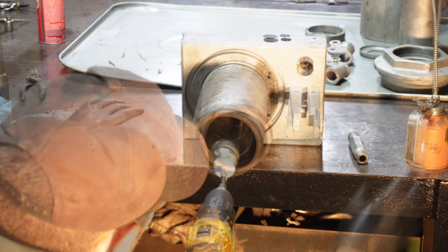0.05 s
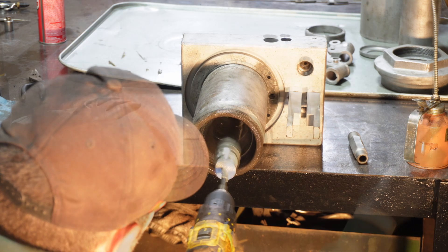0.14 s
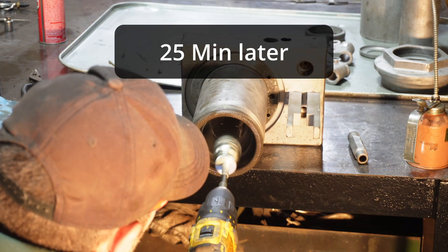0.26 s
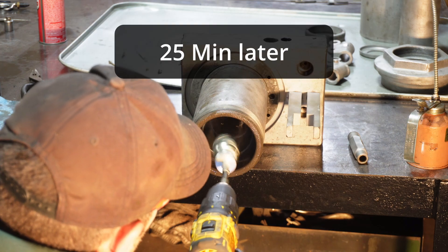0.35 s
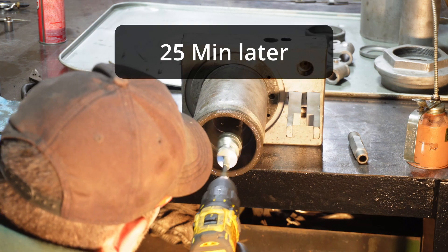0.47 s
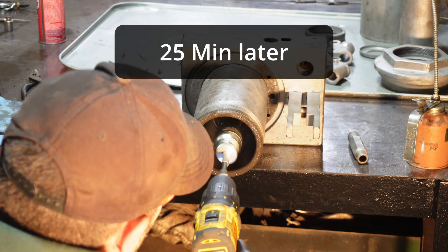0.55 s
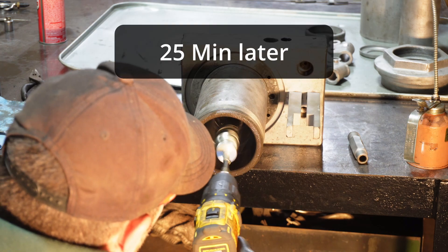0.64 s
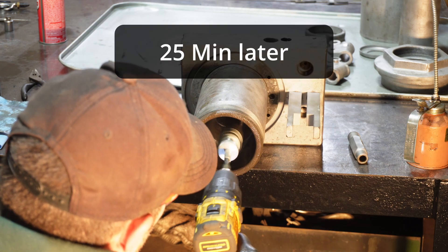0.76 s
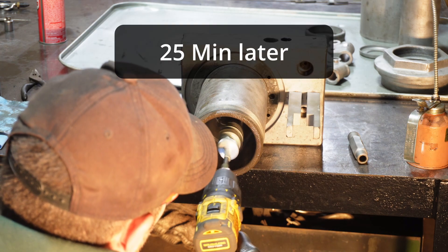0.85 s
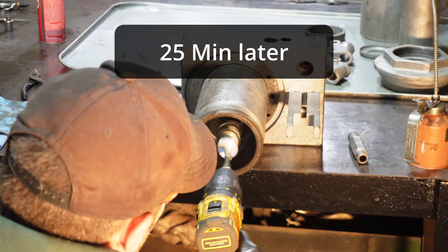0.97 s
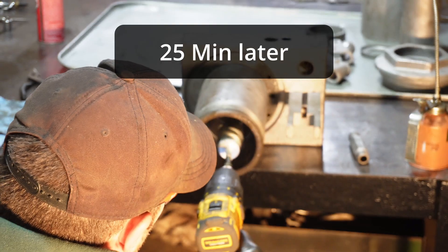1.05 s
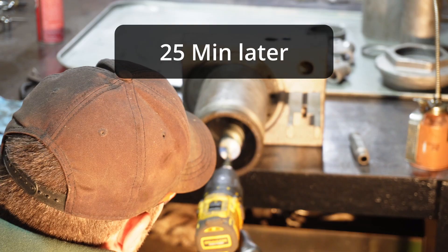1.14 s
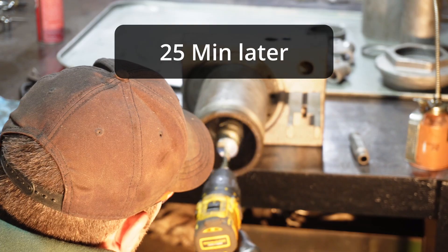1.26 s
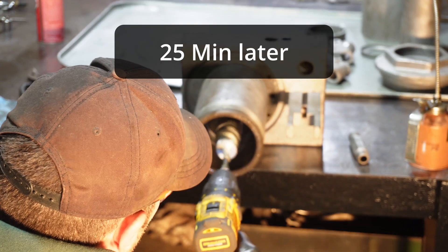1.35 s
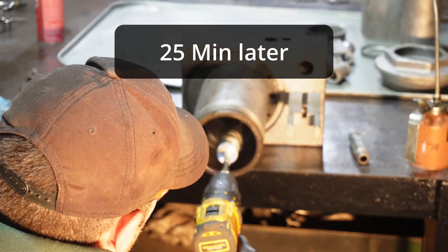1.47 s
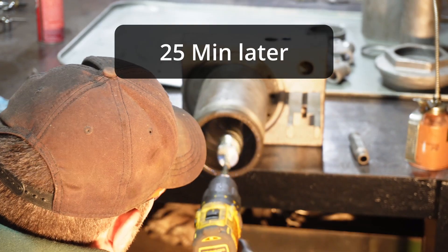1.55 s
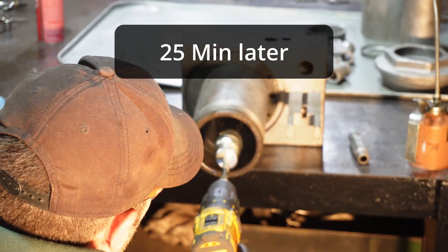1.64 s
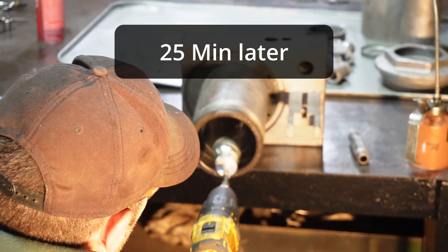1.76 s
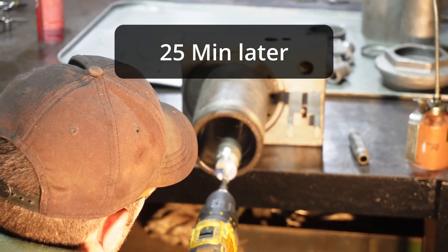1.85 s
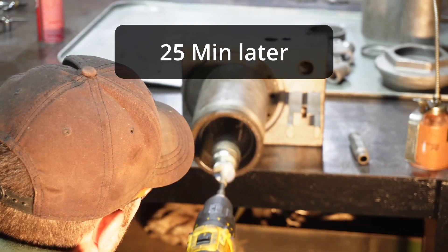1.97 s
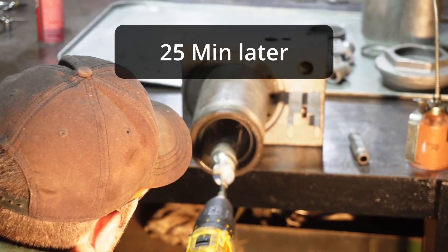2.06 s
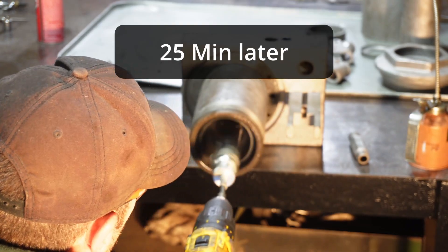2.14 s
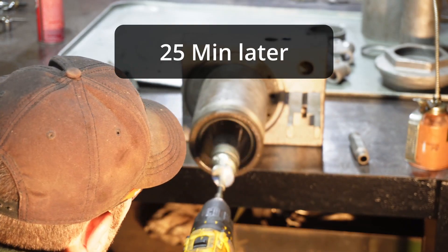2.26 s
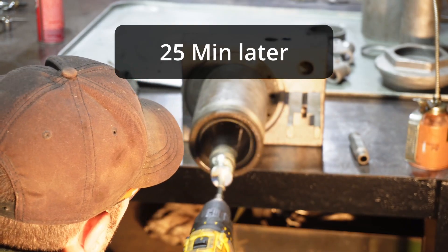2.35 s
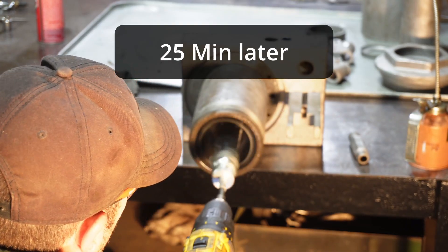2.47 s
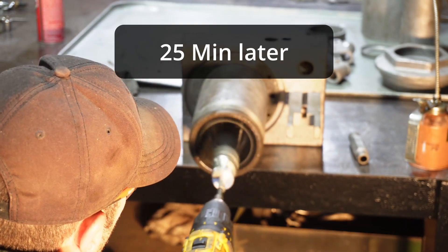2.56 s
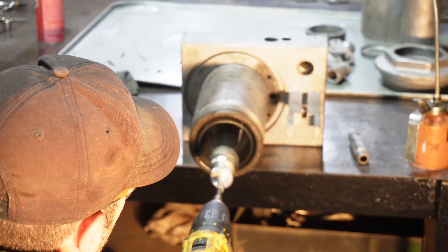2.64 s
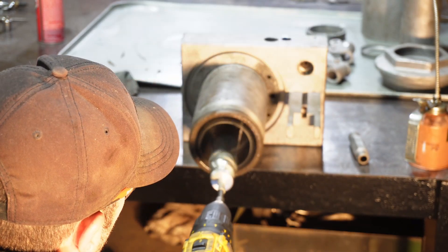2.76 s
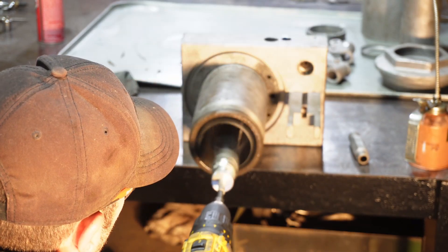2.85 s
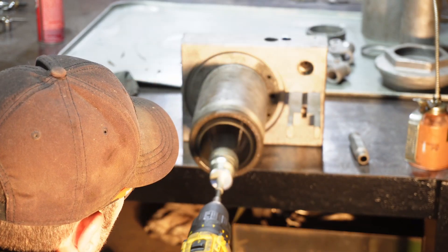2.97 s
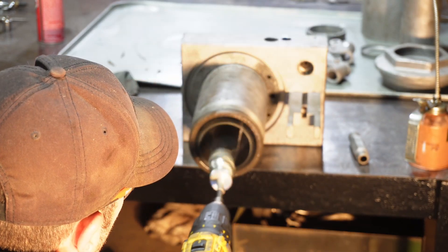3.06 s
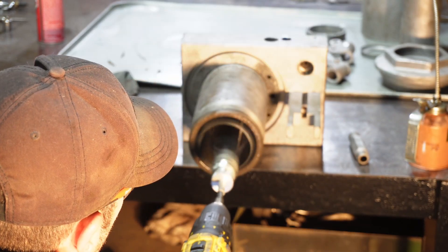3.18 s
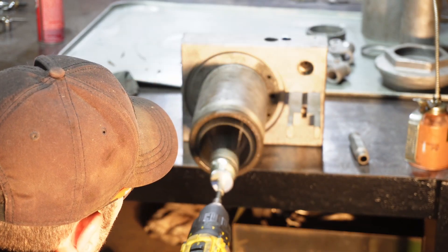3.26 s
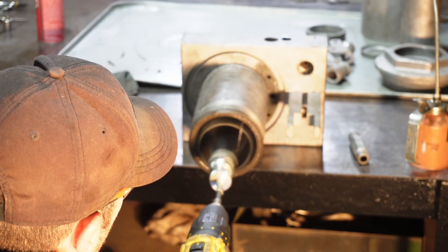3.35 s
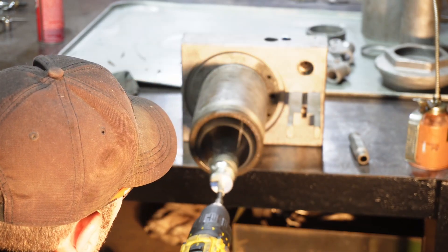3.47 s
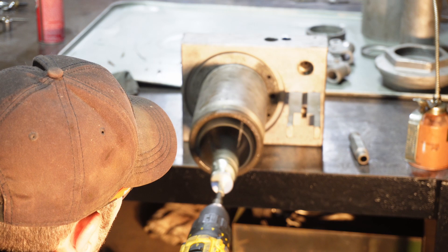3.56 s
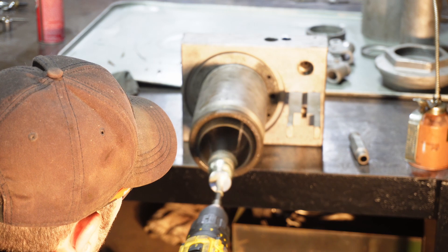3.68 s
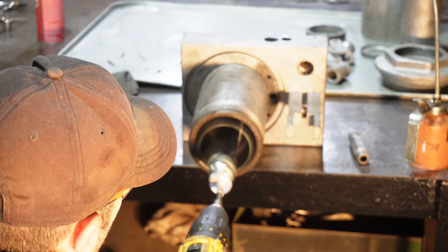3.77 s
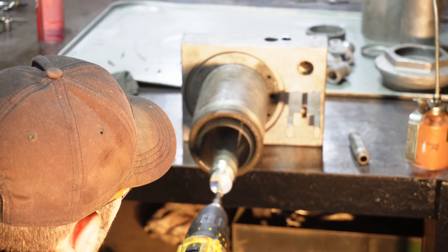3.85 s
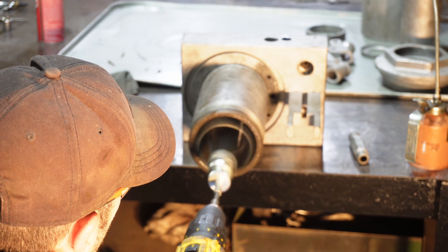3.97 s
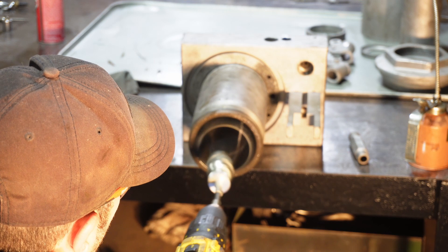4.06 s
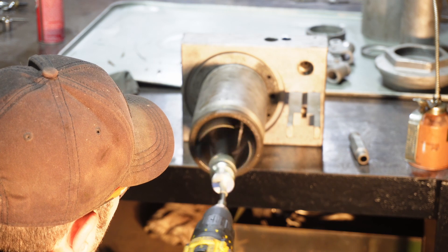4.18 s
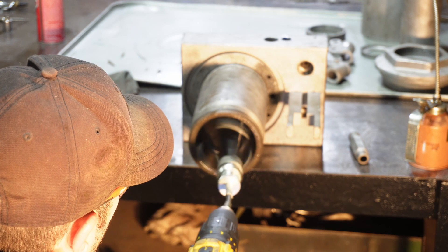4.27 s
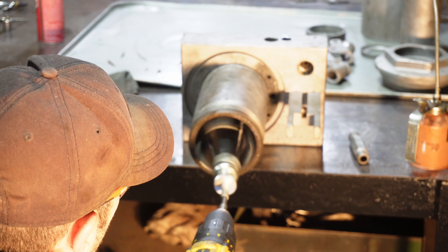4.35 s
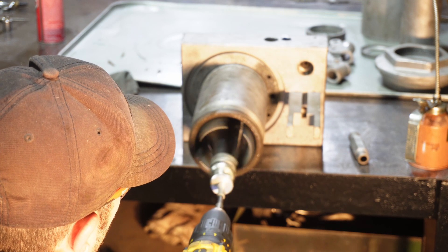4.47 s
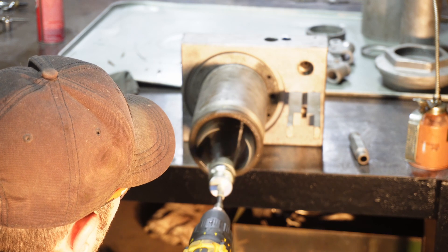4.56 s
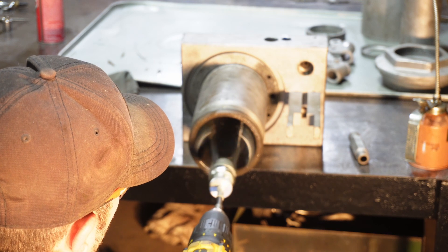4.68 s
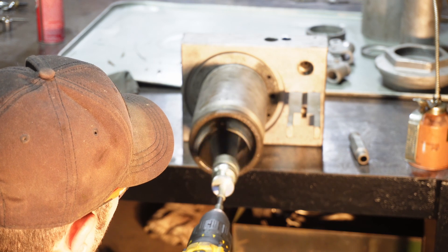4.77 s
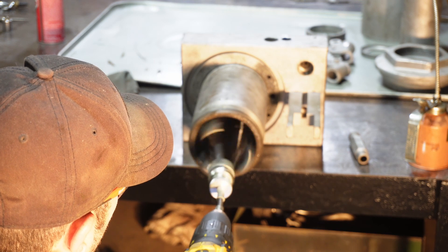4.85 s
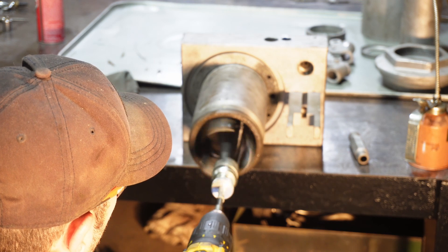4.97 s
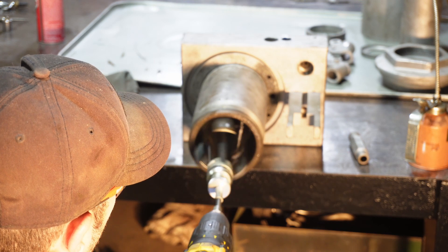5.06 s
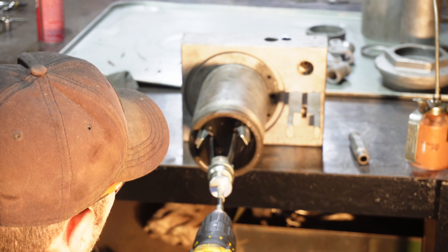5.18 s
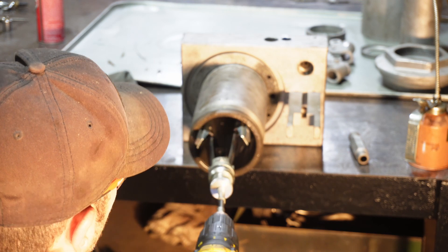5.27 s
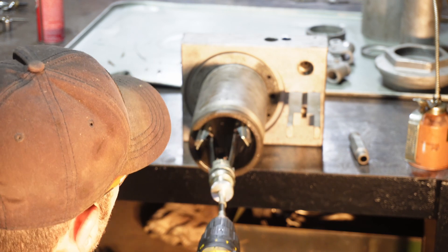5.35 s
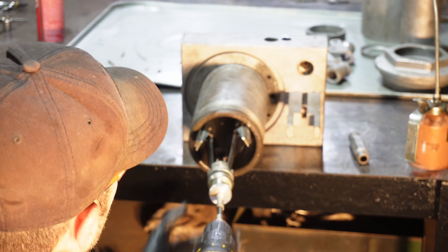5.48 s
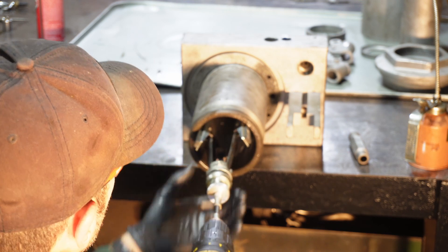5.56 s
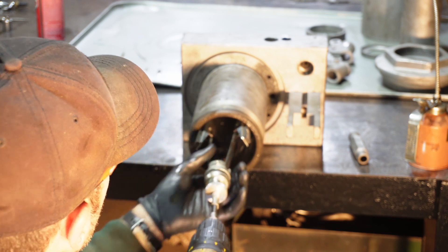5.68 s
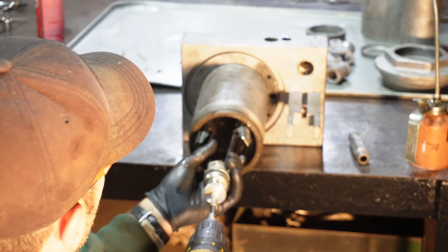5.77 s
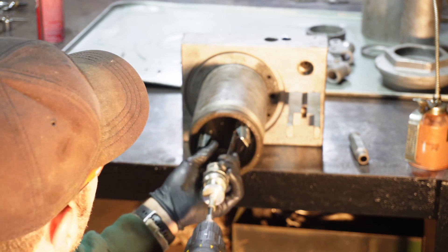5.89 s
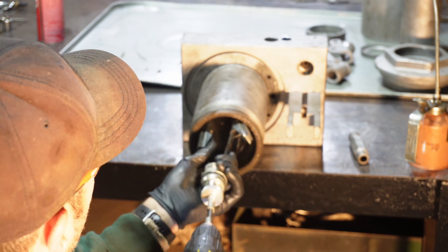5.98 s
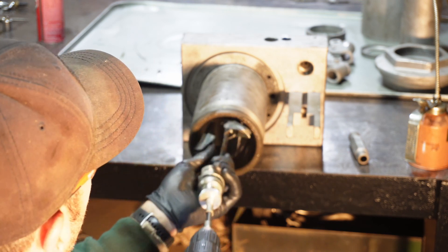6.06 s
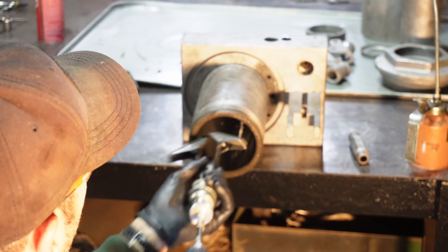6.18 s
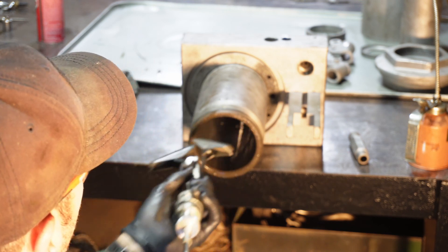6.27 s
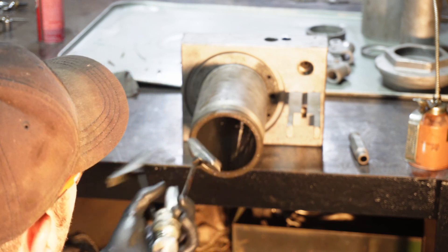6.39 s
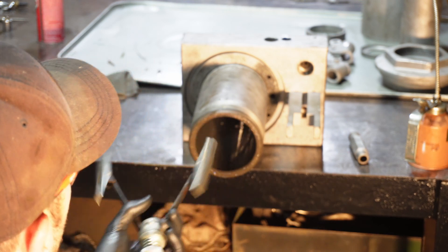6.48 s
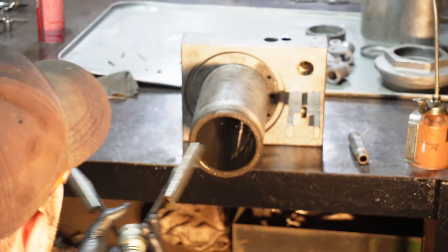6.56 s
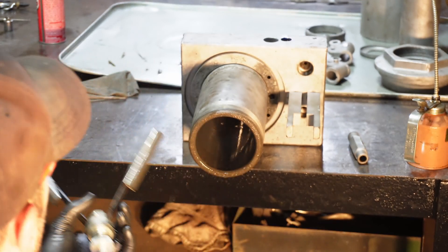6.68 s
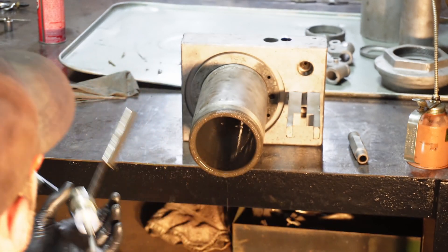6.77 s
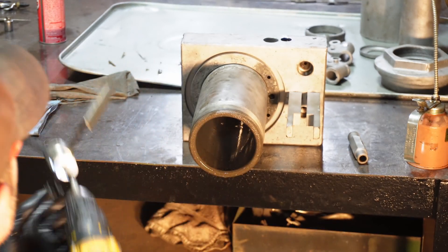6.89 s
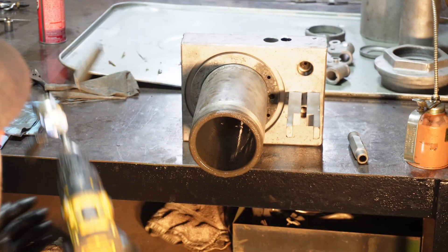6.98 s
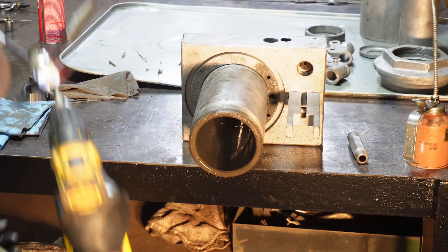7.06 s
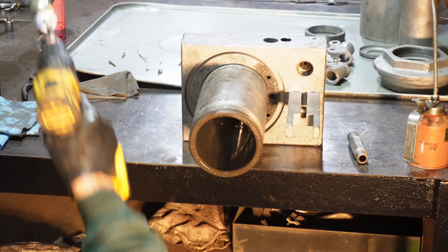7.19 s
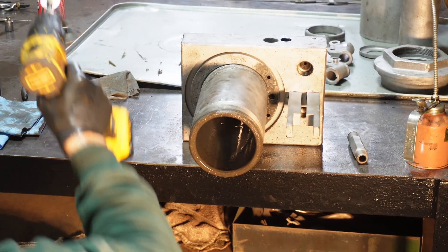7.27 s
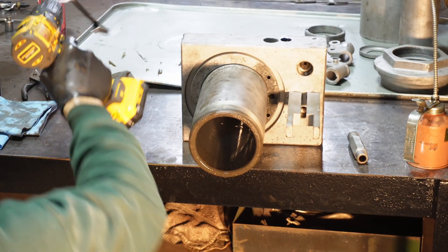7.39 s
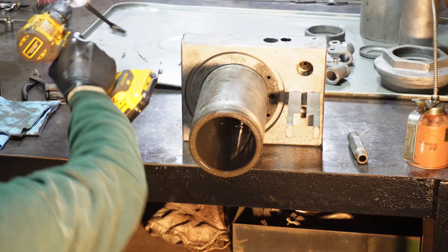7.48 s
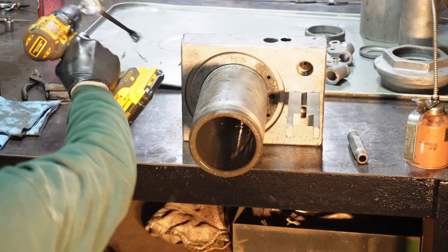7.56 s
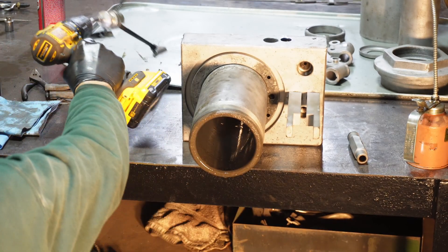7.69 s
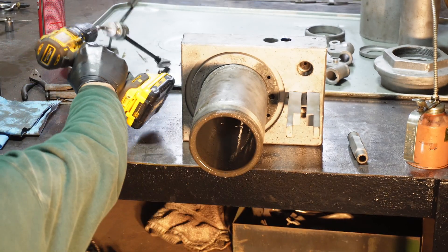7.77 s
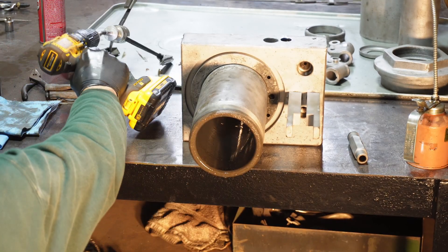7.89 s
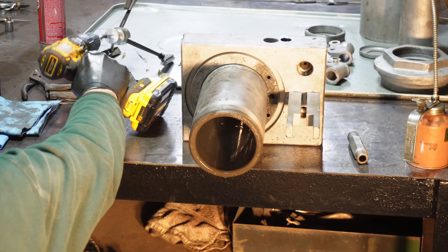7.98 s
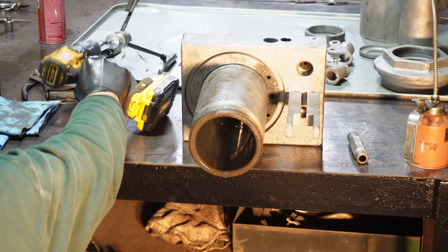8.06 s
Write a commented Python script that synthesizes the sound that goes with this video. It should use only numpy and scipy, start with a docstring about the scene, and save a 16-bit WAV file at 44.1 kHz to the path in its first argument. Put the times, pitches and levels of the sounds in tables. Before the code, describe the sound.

Close to a workshop bench, a cordless drill turns a stone hone inside an oiled steel cylinder, whining high and steady over gritty hiss. The motor eases down, crawls and halts with a dry snap. The hone's arms scrape and clink out of the bore, cloth rustles, and the drill slides and lands with a double thud.

```python
"""A cordless drill spins a spring-armed stone hone in an oiled steel cylinder: motor and gears sing as
tones locked to the shaft, and the stones hiss as gritty noise. The trigger is eased, the drill crawls and stops
with a snap. The hone is drawn out with scraping noise and ringing clinks, a sleeve rustles in noise swells,
and the drill slides over the workbench and is set down as noise thuds with a modal knock."""
import sys
import numpy as np
from scipy import signal
from scipy.fft import rfft, irfft, next_fast_len
from scipy.io import wavfile
from scipy.ndimage import map_coordinates

SR = 44100
rng = np.random.default_rng(int(sys.argv[2]) if len(sys.argv) > 2 else 0)


def store_wav(level_fs):
    """Save 16-bit WAV to argv[1]."""
    pcm = np.round(np.clip(np.atleast_2d(level_fs), -1, 1) * 32767)
    wavfile.write(sys.argv[1], SR, pcm.T.astype(np.int16))


N = 358533  # samples

# Motor whine ride, before trim and line levels: t/s, level/dB
WHINE_RIDE = [(0.0, -35), (0.18, -29.5), (0.4, -31.5), (0.46, -29), (0.91, -30), (1.54, -27.5), (1.61, -29),
              (2.04, -30.5), (2.5, -27), (4.06, -27.5), (4.1, -27)]
# Motor whine pitch under full trigger, before the waver: t/s, f/Hz
WHINE_PITCH = [(0.03, 2596), (0.12, 2601), (0.36, 2521), (0.48, 2555), (0.88, 2558), (1.45, 2601),
               (1.59, 2599), (1.65, 2563), (2.02, 2526), (2.64, 2571), (3.0, 2553), (3.02, 2567),
               (3.8, 2543), (4.11, 2558)]
WHINE_ORDER = 8  # whine cycles per motor turn
# Trigger let out in steps: t/s, glide/s, new motor speed/(turns/s)
TRIGGER_EASES = [(4.13, .2, 116.5), (4.79, .14, 80), (5.1, .05, 56)]
# Motor tones: multiple of motor speed, relative level/dB
MOTOR_TONES = [(1, -22), (2.492, -17.5), (2.758, -12), (2.891, -23), (4, -20.5), (5, -23), (5.383, -26),
               (5.453, -23), (8, 2), (10.57, -21), (10.703, -16)]
# Gear tones: multiple of planet-wheel speed, relative level/dB
GEAR_TONES = [(2, -14), (23, 1.5), (24, -6.5), (25, -3), (48, -1)]
# Shaking of the hone's arms: multiple of spindle speed, relative level/dB
SHAKE_TONES = [(k, 0) for k in range(3, 7)]
PLANET, SPINDLE = 6 / 11, .0656  # turns per motor turn
# How well the drill body radiates gear tones: f/Hz, gain/dB
HOUSING = [(130, -37), (350, -9), (700, -23), (1000, -9), (1200, -13.5), (1470, -5.5), (1900, -18.5),
           (2400, -10.5), (3000, -8), (3300, -7), (4100, 0.5), (4400, 2), (5500, -4.5), (8350, -6.5)]
# Gearbox shell resonances: f/Hz, width/Hz, relative level/dB
GEARBOX_SHELL = [(3390, 120, 0), (4040, 310, -5.5), (5170, 220, -3.5), (8270, 180, -4.5)]
MESH_DB, RATTLE_DB = -35.5, -34.5  # at full speed
STOP_S, STOP_T60_S = 5.16, .03  # the motor halts

# How hard the stones bear on the wall: t/s, load/dB
STONE_LOAD = [(.3, 0.5), (.8, -0.5), (1.4, -1.5), (2, 1), (3.2, 0.5), (4.1, 1)]
FADE_IN_S, FADE_IN_DB = 0.29, 8  # stone hiss and gear tones fade in at the start
# Stone hiss at speed: f/Hz, relative level/dB
FAST_STONES = [(40, -45), (150, -31.5), (400, -12), (900, -7), (1100, -12.5), (1500, -5), (2200, -9.5),
               (3000, -3.5), (3500, -1), (4700, 4), (6300, -2), (7500, -0.5), (11500, -6.5), (14500, -6)]
# Stone hiss at a crawl: f/Hz, relative level/dB
SLOW_STONES = [(59, -65), (100, -31), (271, -16), (315, -10.5), (524, -14.5), (621, -7), (705, -14.5),
               (930, -10.5), (1150, -16.5), (1450, -6.5), (2000, -10.5), (5300, -5.5), (9820, -15.5),
               (14400, -18), (16000, -19)]
# Air column of the cylinder: f/Hz, width/Hz, relative level/dB
BORE_AIR = [(319, 9.6, 4.5), (615, 24, -9.5), (914, 87, 7.5), (1302, 32, -1), (1587, 110, -1.5)]
HISS_DB, BORE_DB = -26.5, -40  # at full speed
HISS_LAW, BORE_LAW, MESH_LAW = 1.04, 1.32, 0.57  # amplitude grows as this power of the speed

# Spindle lock snapping shut as the drill stops
LOCK_S, LOCK_DB = 5.1628, -20  # peak
# Colour of the snap: f/Hz, relative level/dB
SNAP = [(200, -20), (700, -4), (1500, 5), (2500, -1), (4200, 4), (8000, -1.5), (15000, -13)]

# Short pulls drawing out the stopped hone: t/s, length/s, air column level/dB, scrape level/dB, squeak level/dB
PULLS = [(5.156, 0.059, -60, -60, -62), (5.383, 0.11, -61, -70, -90), (5.595, 0.07, -66.5, -83, -92),
         (5.87, 0.09, -63, -63, -65), (5.961, 0.14, -49, -58, -55), (6.1, 0.038, -67, -52, -62),
         (6.2, .12, -54, -58, -67), (6.416, 0.29, -80, -57.5, -76)]
PULL_RISE_S, PULL_T60_S = 0.042, 0.39
# Rub feeding the boom: f/Hz, relative level/dB
PULL_RUB = [(100, -17), (300, 5.5), (500, -8), (1500, -14.5)]
# Boom of the bore: f/Hz, width/Hz, relative level/dB
PULL_BOOM = [(326.0, 8.4, 4.0), (412, 34, -7.5), (451, 10, 2.5)]
# Squeak of the hone: f/Hz, width/Hz, relative level/dB
PULL_SQUEAK = [(2335, 20, -9.5), (2800, 12, -2), (5140, 110, -4)]

# Hone arm striking steel and rebounding: t/s, level before low cut/dB, contact pitch/Hz,
# time between rebounds/s, loss per rebound/dB
CONTACTS = [(5.3265, -40.5, 3640, 0.073, 6.5), (5.8631, -26, 5430, 0.018, 13),
            (6.002, -34.5, 4600, .004, 3), (6.0153, -25, 4630, .012, 23), (6.108, -27.5, 4660, 0.0085, 3),
            (6.128, -18.5, 6070, .01, 10), (6.1727, -22.5, 4070, .011, 16), (6.26, -26, 5050, 0.015, 8),
            (6.4074, -36, 4060, .009, 8), (6.4343, -24, 4050, 0.018, 2), (6.5522, -26, 4570, .01, 11),
            (6.595, -22, 7510, 0.017, 4), (6.781, -35, 4390, 0.028, 16), (6.8289, -29, 4140, 0.023, 23),
            (6.9056, -23.5, 5030, 0.016, 10), (7.085, -36, 6430, .02, 25), (7.3208, -38, 5900, .015, 17),
            (7.5343, -37, 4800, 0.018, 13), (7.604, -36, 5320, 0.029, 5), (7.7608, -43.5, 4200, .02, 18)]
CONTACT_T60_S, REBOUND_SCATTER = 0.023, 0.063  # scatter as a share of each rebound time
# Scratch of arm on steel: f/Hz, relative level/dB
CLINK = [(290, -46), (500, -9.5), (960, -7), (1050, -10), (1770, -17), (2070, -14), (3390, -11.5),
         (4150, -2), (6060, -9), (6800, -14), (8090, -7), (10100, -22.5), (11300, -16.5), (14000, -22),
         (16000, -33)]
# Steel of hone and cylinder: f/Hz, relative level/dB, t60/s
STEEL = [(2380, -8, .2), (2820, -3, 0.21), (3750, 1, .15), (4170, -10, 0.12), (4400, -2, .3),
         (4600, -4, 0.23), (5220, -4, .3), (5860, -15, 0.17), (7337, -12, .3), (7450, -5, 0.2),
         (8540, -1, .22), (12700, -18, .15)]
# Modes of a hone arm: multiple of contact pitch, relative level/dB
ARM_MODES = [(.55, -12), (1, 7), (1.2, -7.5), (1.85, -3), (2.7, -14)]
ARM_WIDTH_HZ, ARM_DB = 164, 1.5  # ring of a struck arm
ARM_LOW_CUT_HZ = 1200  # thin arms radiate little below this
# Low ring hanging on between the taps: f/Hz, width/Hz, relative level/dB
LOW_RING = [(456.6, 1.6, 0)]
SCUFF_DB, SCUFF_LEAD_S, SCUFF_T60_S = -22, 0.013, 0.1  # level is on top of each contact's

# Cloth colour: f/Hz, relative level/dB
SLEEVE_CLOTH = [(35, -41), (60, -13), (287, -2), (323, -12), (354, -8), (389, -2), (924, -5), (1060, -9),
                (2580, -15.5), (3420, -22), (16000, -36)]
# Swishing folds of the sleeve: t/s, rise/s, level/dB
SWISHES = [(5.35, 0.062, -62.5), (5.8, 0.18, -61.5), (6.3, 0.075, -61), (6.85, 0.19, -54),
           (7.174, .006, -55.5), (7.28, 0.074, -52.5), (7.52, 0.12, -59.5)]
SWISH_T60_S = 1.87

# Drill body scraping on the bench: f/Hz, relative level/dB
SLIDE_COLOUR = [(47, -53), (80, -19), (166, -26), (237, -10), (265, -15), (323, -1.5), (538, -8.5),
                (672, -0.5), (820, -8.5), (1090, -7.5), (1950, -17.5), (4940, -20), (16000, -45)]
# Slides over the bench: t/s, length/s, level/dB
SLIDES = [(7.826, .03, -35), (7.859, 0.056, -38.5), (8.056, .1, -37.5)]
SLIDE_RISE_S, SLIDE_T60_S = 0.0068, 0.79
# Battery landing, first softly on one edge, then flat: t/s, thud level/dB, t60/s, bench ring level/dB, brightness/Hz
KNOCKS = [(8.019, -21, .22, -23, 1100), (8.0265, -21.5, .28, -31, 14000)]
# Thud of the battery: f/Hz, relative level/dB
THUD = [(35, -81), (60, -51), (130, -19), (222, -20), (274, -14), (315, -13), (371, -10), (408, -10),
        (1380, -18.5), (1950, -24.5), (2970, -31), (3670, -22.5), (16000, -56)]
# Workbench modes: f/Hz, relative level/dB, t60/s
BENCH_MODES = [(285, -14, .3), (390, 0, .16), (450, -3, .1), (587, -7, .25), (807, -7, .19)]
# Soft bumps against the bench, before their envelope: t/s, level/dB
BUMPS = [(6.921, -48), (7.657, -54), (8.068, -29)]
# Bench frame under a bump: f/Hz, relative level/dB
FRAME = [(30, -25), (70, -12), (150, 4), (350, 2), (1200, -40.5)]

# Steady noise floor: f/Hz, relative level/dB
NOISE_FLOOR = [(15, -52), (25, -16.5), (117, -21), (134, -25), (285, -18.5), (317, -12), (373, -19),
               (451, -23.5), (840, -32), (5280, -31), (16000, -40.5)]
# Room decay: f/Hz, t60/s
ROOM_DECAY = [(200, 0.83), (2000, 0.32), (12000, 0.11)]
TOP_HZ = 16100  # band limit


def amp(db):
    """Decibels to gain."""
    return 10 ** (np.asarray(db) / 20)


def unit(x):
    """Scale to rms 1."""
    return x / np.sqrt(np.mean(x ** 2) + 1e-20)


def along(points, hz):
    """Read (Hz, value) points on a log frequency axis."""
    f, v = np.transpose(points)
    return np.interp(np.log(hz + 1), np.log(f + 1), v)


def curves(rows):
    """One value per sample for each column after the time."""
    s, *cols = np.transpose(rows)
    return [np.interp(np.arange(N) / SR, s, c) for c in cols]


def fade(start, t60):
    """1 until start, then falling 60 dB in each t60."""
    return amp(-60 * np.maximum(np.arange(N) / SR - start, 0) / t60)


def stroke(start, length, rise, t60):
    """A straight rise, a hold until length is over, then a decay."""
    return np.clip((np.arange(N) / SR - start) / rise, 0, 1) * fade(start + length, t60)


def blow_envelope(t, t60, attack):
    """Soft exponential attack (time constant in s) and a decay of 60 dB per t60."""
    return amp(-60 * t / t60) * (1 - np.exp(-t / attack))


def wobble(rate):
    """A smooth random curve, rate knots a second."""
    knots = rng.standard_normal(int(N * rate / SR) + 4)
    steps = np.arange(10 * len(knots)) / 10
    return np.interp(np.arange(N) * rate / SR, steps, map_coordinates(knots, [steps]))


def filtered(x, response):
    """x times a response of frequency."""
    m = next_fast_len(x.shape[-1] + SR // 4)
    return irfft(rfft(x, m) * response(np.fft.rfftfreq(m, 1 / SR)), m)[..., :x.shape[-1]]


def darkened(x, corner_hz):
    """Roll off the treble above the corner without shifting phase."""
    return filtered(x, lambda hz: 1 / (1 + (hz / corner_hz) ** 4))


def coloured(x, spectrum):
    """x shaped by (Hz, dB) points, rms 1."""
    return unit(filtered(x, lambda hz: amp(along(spectrum, hz))))


def resonate(x, modes):
    """x through (Hz, width, dB) resonances of alternating sign, rms 1."""
    def response(f):
        total = 0
        for k, (centre, width, db) in enumerate(modes):
            damping = 1j * f * width
            total = total + (-1) ** k * amp(db) * damping / (centre * centre - f * f + damping)
        return total
    return unit(filtered(x, response))


def grit(spread_db, rate=1500):
    """Friction: noise in tiny bursts of uneven strength, rms 1."""
    return unit(rng.standard_normal(N) * amp(spread_db * wobble(rate)))


def ring(modes, t):
    """Damped modes, at new strengths and polarities for every blow."""
    total = 0
    for hz, db, t60 in modes:
        level = amp(db + rng.normal(0, 3) - 60 * t / t60)
        total = total + level * np.sin(2 * np.pi * hz * t) * rng.choice([-1, 1])
    return total


def tones(turns, orders, flutter_db, blur):
    """Lines on multiples of a shaft angle, each fluttering in level and phase (blur in radians)."""
    total = 0
    for k, db in orders:
        level = amp(db + flutter_db * wobble(70)) * np.sqrt(2)
        total = total + level * np.sin(2 * np.pi * k * turns + blur * wobble(45))
    return total


def add(track, s, sound):
    """Mix a sound in at time s."""
    part = track[round(s * SR):][:len(sound)]
    part += sound[:len(part)]


def noise_floor():
    """Steady coloured noise lies under everything."""
    return amp(-66) * coloured(rng.standard_normal(N), NOISE_FLOOR)


def workshop(x):
    """The room answers after 5 ms with a decaying noise tail; treble dies first."""
    hz, t, z = signal.stft(rng.standard_normal(SR // 2), SR, nperseg=256)
    decay = amp(-60 * t / along(ROOM_DECAY, hz)[:, None])
    tail = signal.istft(z * decay, SR, nperseg=256)[1]
    delayed = np.pad(x, (SR // 200, 0))
    return signal.fftconvolve(delayed, tail / np.linalg.norm(tail))[:N]


def sleeve():
    """Cloth rustles as the arm reaches over the bench; low and high folds swish independently."""
    power = sum((amp(db) * stroke(s, rise, rise, SWISH_T60_S)) ** 2 for s, rise, db in SWISHES)
    cloth = coloured(grit(spread_db=1.5, rate=470), SLEEVE_CLOTH)
    low = darkened(cloth, 900)
    high = cloth - low
    folds = low * amp(0.53 * wobble(28)) + high * amp(1.1 * wobble(29))
    return np.sqrt(power) * folds


def set_down():
    """The drill scrapes along the bench, its battery lands in two knocks that ring the top,
    and a last slide and soft bump follow; softer bumps come earlier."""
    shove = sum(amp(db) * stroke(s, length, SLIDE_RISE_S, SLIDE_T60_S) for s, length, db in SLIDES)
    out = shove * amp(0.97 * wobble(90)) * coloured(grit(spread_db=0.0, rate=430), SLIDE_COLOUR)
    t = np.arange(SR // 2) / SR
    low_cut = signal.butter(2, 200, "highpass", fs=SR, output="sos")  # the knocks carry little deep bass
    for s, db, t60, ring_db, bright_hz in KNOCKS:
        noise = coloured(rng.standard_normal(len(t)), THUD)
        thud = darkened(noise, bright_hz) * amp(-60 * t / t60)
        blow = (amp(db) * thud + amp(ring_db) * ring(BENCH_MODES, t)) * (1 - np.exp(-t / 0.00042))
        add(out, s, signal.sosfilt(low_cut, blow))
    for s, db in BUMPS:
        frame = coloured(rng.standard_normal(len(t)), FRAME)
        add(out, s, amp(db) * frame * blow_envelope(t, 0.12, .003))
    return out


def loose_arms():
    """The freed arms tick faintly at random while the drill is carried: very uneven friction noise."""
    ticks = coloured(grit(spread_db=6, rate=130), CLINK)
    return amp(-63) * stroke(6.4, 0.21, 0.11, 7.2) * ticks


def scuffs():
    """A light scrape builds up to each strike and dies away after it."""
    touch = 0
    for s, db, *_ in CONTACTS:
        touch = touch + amp(db) * stroke(s - SCUFF_LEAD_S, SCUFF_LEAD_S, SCUFF_LEAD_S, SCUFF_T60_S)
    return amp(SCUFF_DB) * touch * coloured(grit(spread_db=10.5, rate=450), CLINK)


def clinks():
    """The hone's sprung arms tap the steel and rebound, each time more weakly."""
    taps, t = np.zeros(N), np.arange(SR // 4) / SR
    chatter = grit(spread_db=6.5, rate=1500)
    touch = blow_envelope(t, CONTACT_T60_S, 0.0015)
    for start, level_db, hz, gap, loss_db in CONTACTS:
        # a contact is a short chatter of micro-impacts, coloured by where the arm is struck
        arm = [(hz * ratio * np.exp(.04 * rng.normal()), ARM_WIDTH_HZ, db) for ratio, db in ARM_MODES]
        for k in range(4):
            s = start + gap * k * (1 + REBOUND_SCATTER * rng.normal())
            rub = chatter[round(s * SR):][:len(t)] * touch
            scratch = coloured(rub, CLINK) + amp(ARM_DB) * resonate(rub, arm)
            steel = amp(-30.0) * ring(STEEL, t) * (1 - np.exp(-t / .002))
            tap = scratch / np.abs(scratch).max() + steel
            add(taps, s, amp(level_db - k * loss_db) * tap)
    bright = filtered(taps, lambda hz: 1j * hz / (ARM_LOW_CUT_HZ + 1j * hz))
    return bright + amp(-77) * resonate(taps, LOW_RING)


def withdrawal():
    """At each pull the stopped hone scrapes and squeaks along the bore, which booms softly."""
    air, drag, squeal = sum(amp(levels_db)[:, None] * stroke(s, length, PULL_RISE_S, PULL_T60_S)
                            for s, length, *levels_db in PULLS)
    rub = coloured(grit(spread_db=3.5), PULL_RUB)
    boom = air * resonate(rub, PULL_BOOM)
    scrape = drag * coloured(grit(spread_db=4.5, rate=250), CLINK)
    squeak = squeal * resonate(grit(spread_db=-7), PULL_SQUEAK)
    return boom + scrape + squeak


def spindle_lock():
    """One dry, bright noise snap from inside the gearbox."""
    t = np.arange(SR // 10) / SR
    snap = coloured(rng.standard_normal(len(t)), SNAP) * blow_envelope(t, 0.024, .001)
    out = np.zeros(N)
    add(out, LOCK_S, amp(LOCK_DB) * snap / np.abs(snap).max())
    return out


def honing(speed, turns, load):
    """Stones rub the oiled wall, louder and brighter at speed, and sound the air in the bore."""
    effort = np.maximum(speed, 75) / speed.max()  # the stones still rub as the shaft halts
    angle = 2 * np.pi * SPINDLE * turns
    pressure = load * amp(0.42 * np.sin(angle) + 0.373 * np.sin(2 * angle) + 0.42 * wobble(60))
    fast = np.clip((speed - 120) / 190, 0, 1)  # crossfade from crawl to full speed
    quick = coloured(grit(spread_db=1.5), FAST_STONES)
    slow = amp(-0.6) * coloured(grit(spread_db=2), SLOW_STONES)
    hiss = amp(HISS_DB) * effort ** HISS_LAW * (fast * quick + (1 - fast) * slow)
    bore_level = amp(BORE_DB + 1.16 * np.sin(angle) + 1.2 * np.sin(2 * angle)) * effort ** BORE_LAW
    bore = bore_level * resonate(grit(spread_db=-1), BORE_AIR)
    return pressure * (hiss + bore) * fade(5.15, 0.087)


def motor_speed():
    """Motor turns per second: nearly steady under full trigger, then gliding down to each new setting."""
    speed = curves(WHINE_PITCH)[0] / WHINE_ORDER
    for s, length, new in TRIGGER_EASES:
        u = np.clip((np.arange(N) / SR - s) / length, 0, 1)
        speed = speed + (new - speed) * np.sin(np.pi / 2 * u) ** 2
    # the motor speed wavers at random, far more at a crawl
    return speed + np.interp(speed, [80, 120, 310], [4, 3, .45]) * wobble(45)


def drill(speed, turns, load):
    """Motor whine, gear tones, gearbox rattle and a low shake, all tied to the motor shaft."""
    whine_db, = curves(WHINE_RIDE)
    effort = speed / speed.max()
    bind = np.sin(4 * np.pi * SPINDLE * turns)  # the hone binds twice a turn and holds the shaft back
    shaft = turns + 0.0046 * bind
    lines = tones(shaft, MOTOR_TONES, flutter_db=.8, blur=.13)
    motor = amp(whine_db - 1.5 + 0.5 * bind) * fade(4.135, 0.12) * lines
    # each gear tone swells as it glides through a resonance of the housing
    drive = load * np.maximum(effort, .25) ** MESH_LAW
    mesh = tones(PLANET * shaft, GEAR_TONES, flutter_db=1.6, blur=.25)
    gears = amp(MESH_DB) * drive * filtered(mesh, lambda hz: amp(along(HOUSING, hz)))
    # teeth clash once and twice per turn of a planet wheel
    planet_angle = 2 * np.pi * PLANET * turns
    clash = amp(4.2 * np.sin(planet_angle) + 1.7 * np.sin(2 * planet_angle))
    rattle = amp(RATTLE_DB) * drive * effort * resonate(clash * grit(spread_db=0.5), GEARBOX_SHELL)
    # the hone's arms shake the bench a few times per spindle turn
    shake_lines = tones(SPINDLE * turns, SHAKE_TONES, flutter_db=4, blur=.4)
    shake = amp(-73) * load * effort ** 3 * shake_lines
    return (motor + gears + rattle + shake) * fade(STOP_S, STOP_T60_S)


def scene():
    """Everything reaches one microphone close to the bench; all but drill and floor excite the room."""
    speed = motor_speed()
    turns = np.cumsum(speed) / SR
    load_db, = curves(STONE_LOAD)
    swell_db = FADE_IN_DB * np.maximum(1 - np.arange(N) / SR / FADE_IN_S, 0)
    load = amp(load_db - swell_db)
    handling = sleeve() + set_down() + loose_arms()
    hone = scuffs() + clinks() + withdrawal() + honing(speed, turns, load)
    rubbing = handling + hone + spindle_lock()
    mono = noise_floor() + amp(-15.5) * workshop(rubbing) + rubbing + drill(speed, turns, load)
    return np.array([mono, mono])


def record(dry):
    """The microphone thins the deep bass, and a steep cut leaves nothing above the band limit."""
    thin = signal.sosfilt(signal.butter(1, 35, "highpass", fs=SR, output="sos"), dry)
    return filtered(thin, lambda hz: 1 / (1 + (hz / TOP_HZ) ** 300))


dry = scene()
out = record(dry)
store_wav(out)
```